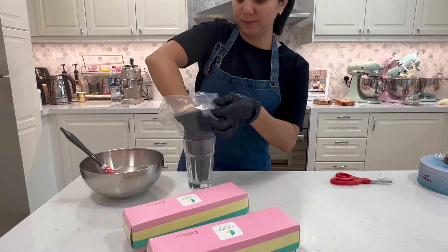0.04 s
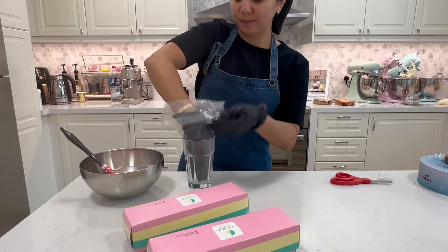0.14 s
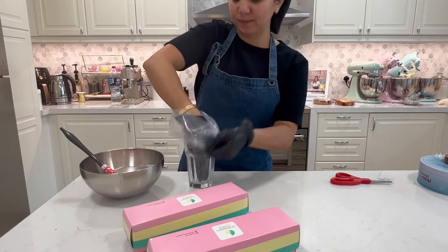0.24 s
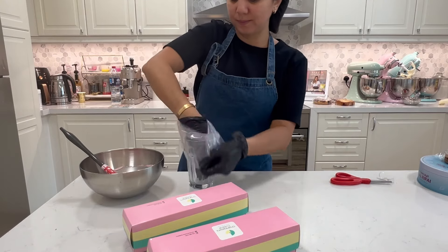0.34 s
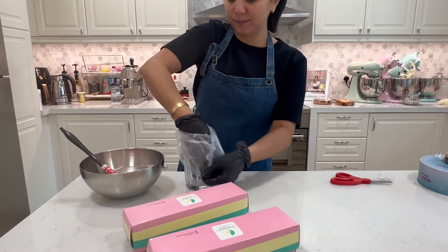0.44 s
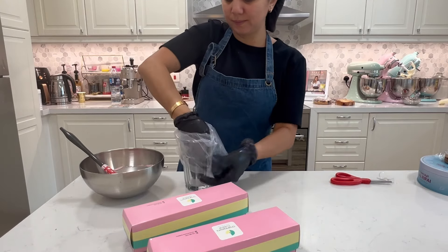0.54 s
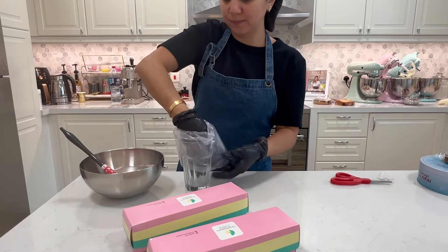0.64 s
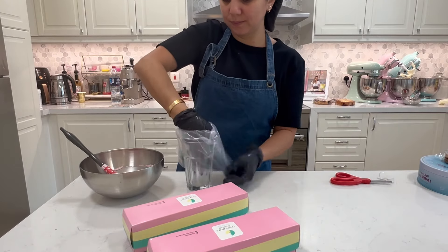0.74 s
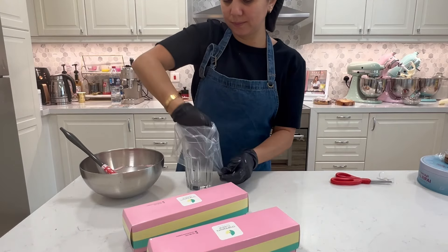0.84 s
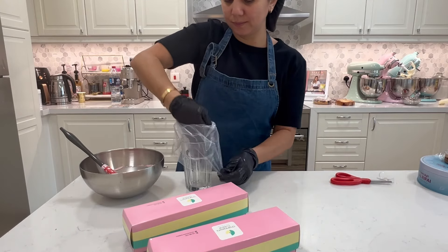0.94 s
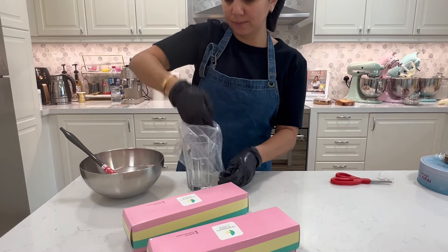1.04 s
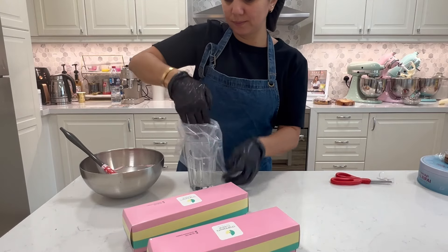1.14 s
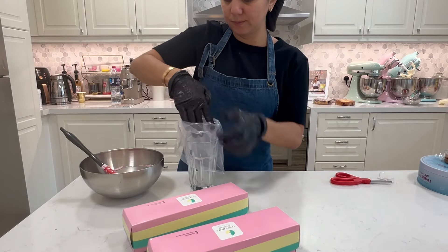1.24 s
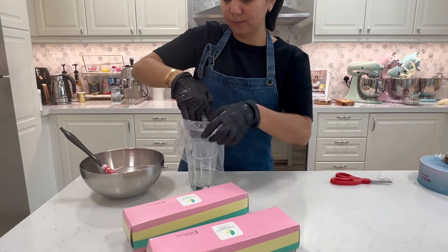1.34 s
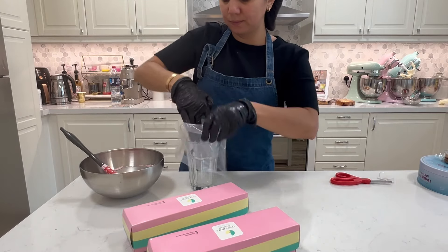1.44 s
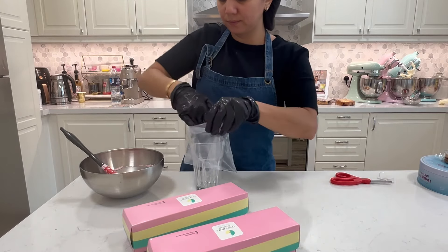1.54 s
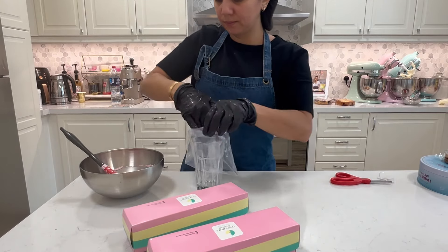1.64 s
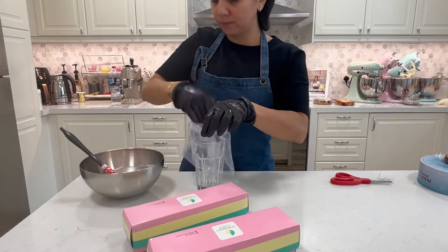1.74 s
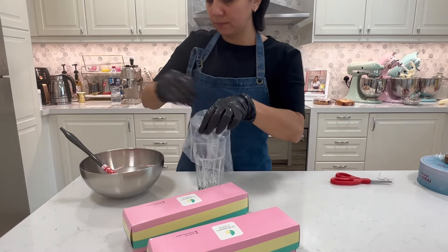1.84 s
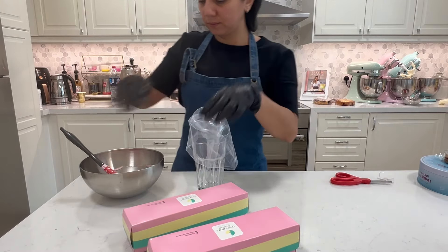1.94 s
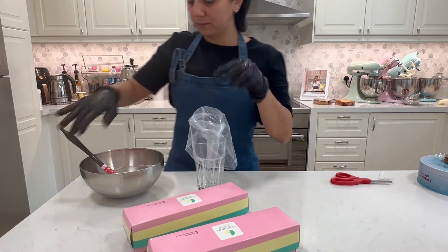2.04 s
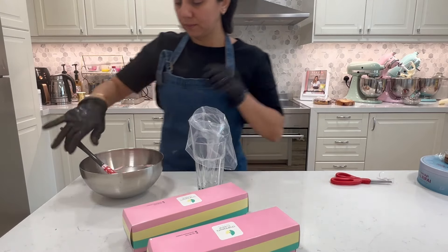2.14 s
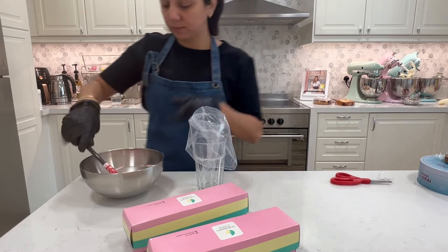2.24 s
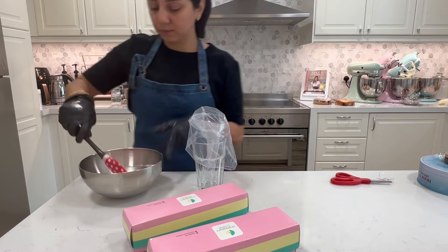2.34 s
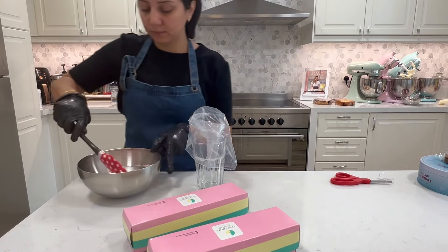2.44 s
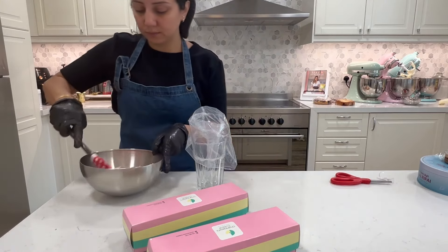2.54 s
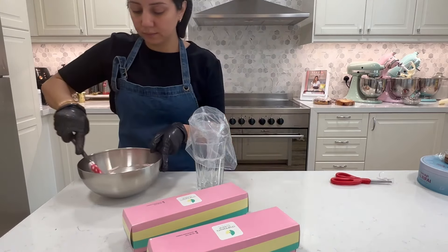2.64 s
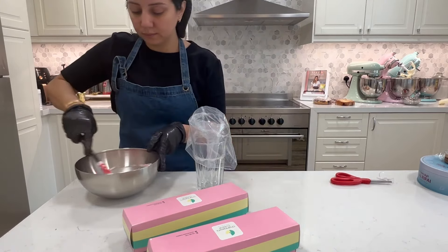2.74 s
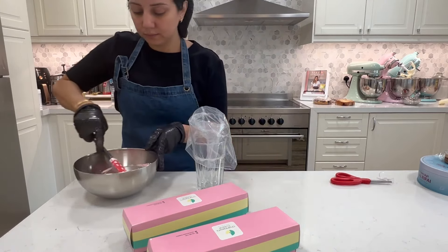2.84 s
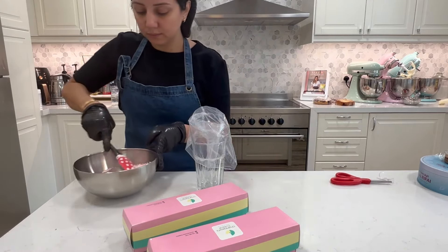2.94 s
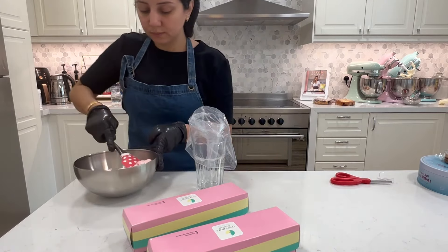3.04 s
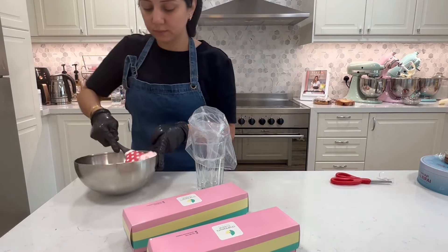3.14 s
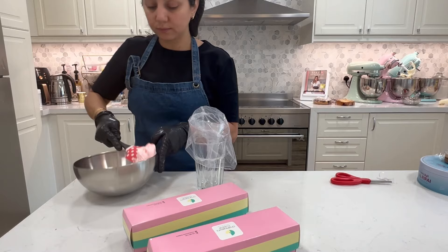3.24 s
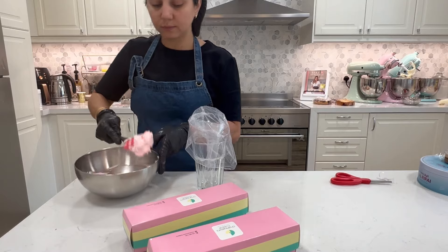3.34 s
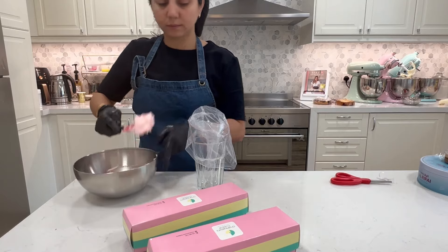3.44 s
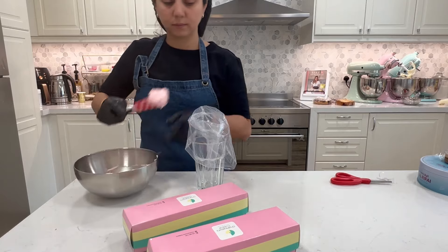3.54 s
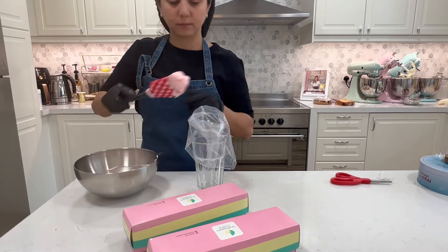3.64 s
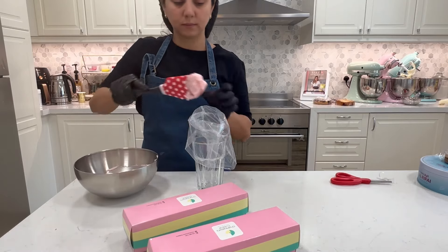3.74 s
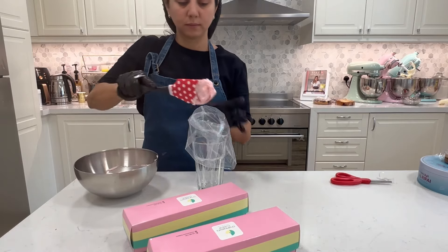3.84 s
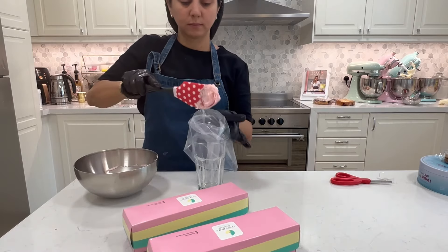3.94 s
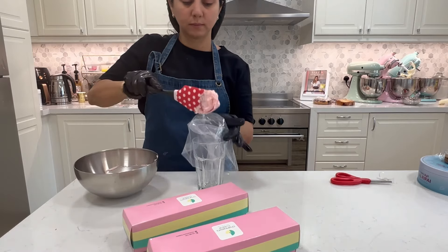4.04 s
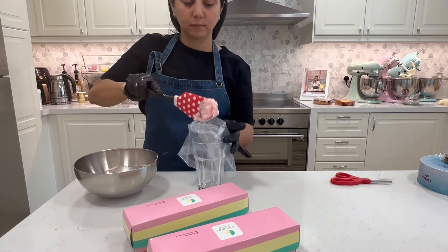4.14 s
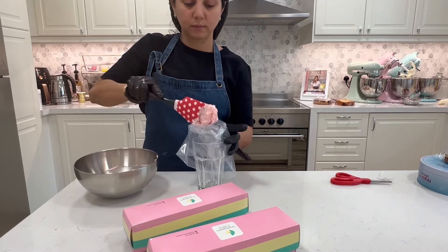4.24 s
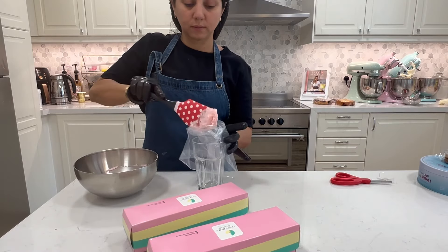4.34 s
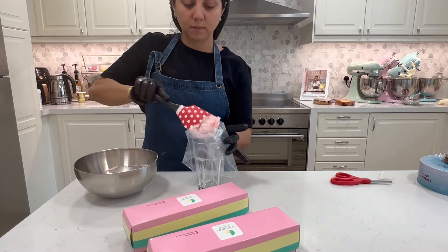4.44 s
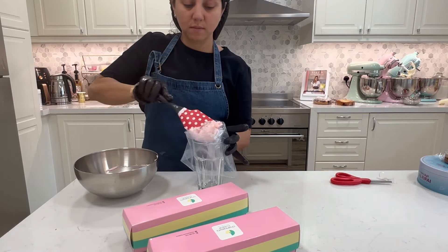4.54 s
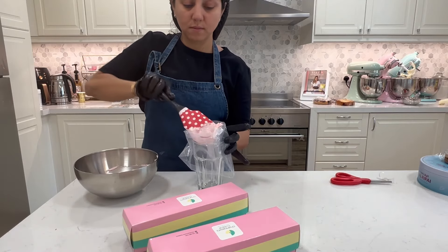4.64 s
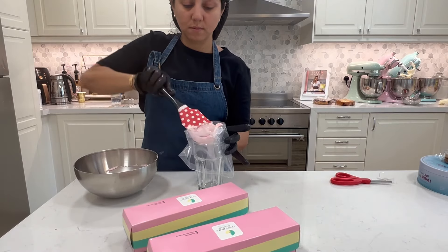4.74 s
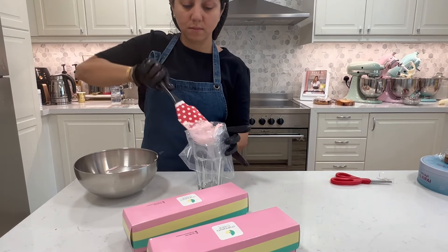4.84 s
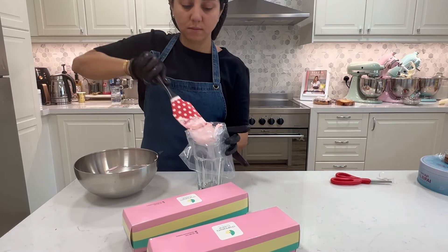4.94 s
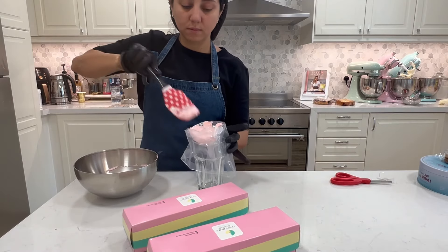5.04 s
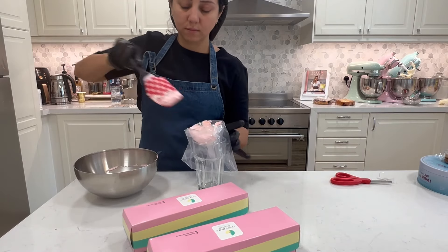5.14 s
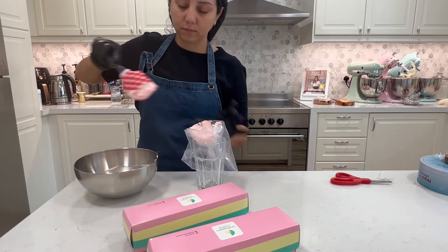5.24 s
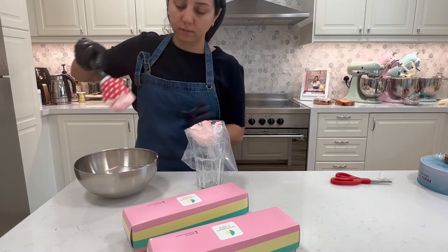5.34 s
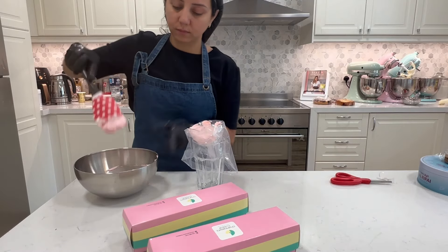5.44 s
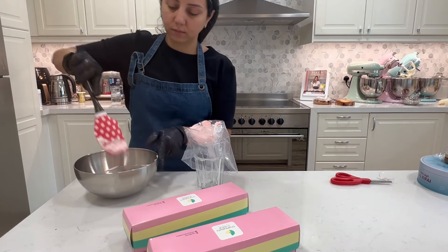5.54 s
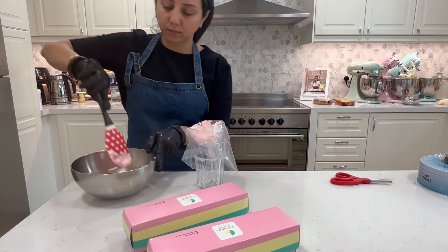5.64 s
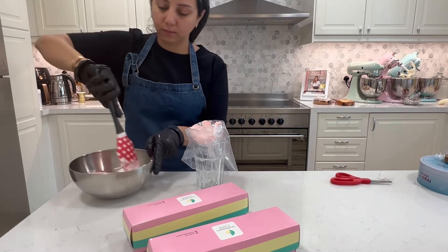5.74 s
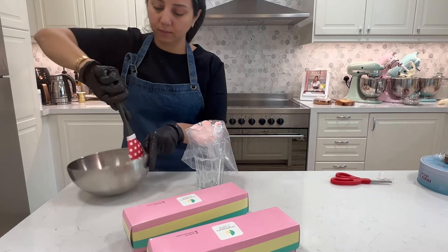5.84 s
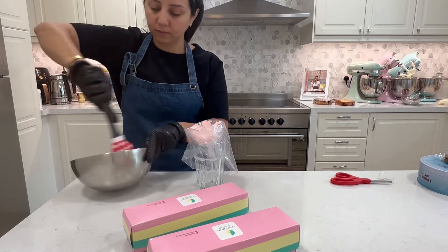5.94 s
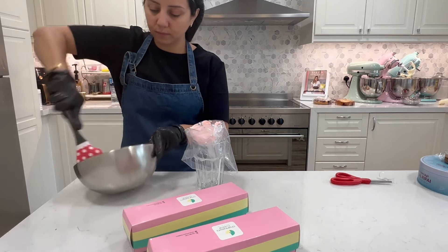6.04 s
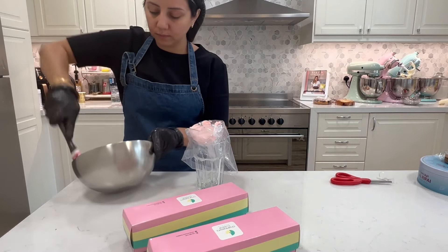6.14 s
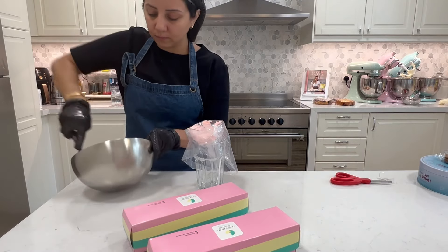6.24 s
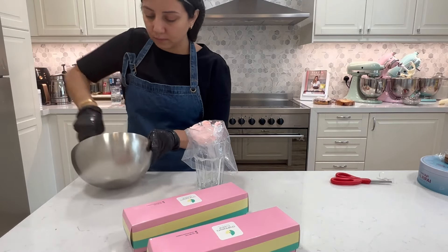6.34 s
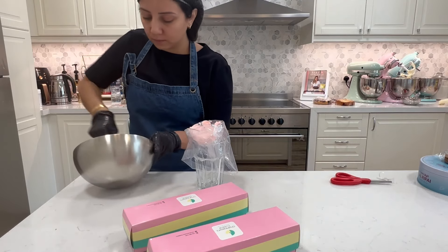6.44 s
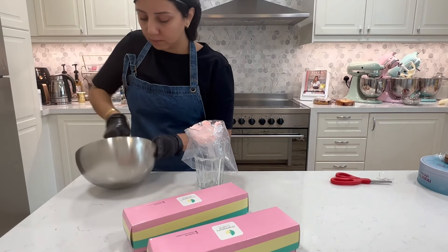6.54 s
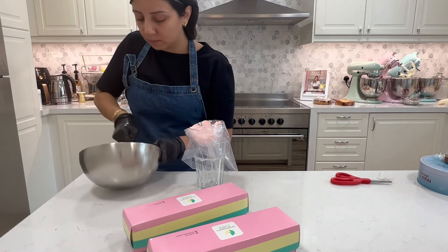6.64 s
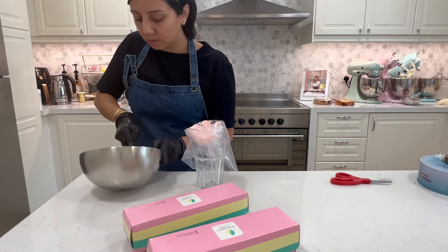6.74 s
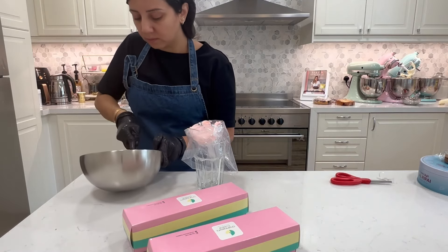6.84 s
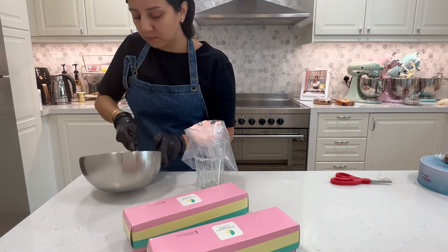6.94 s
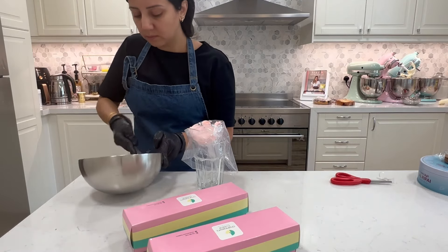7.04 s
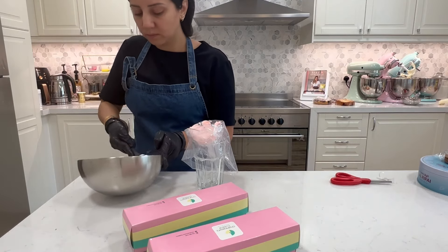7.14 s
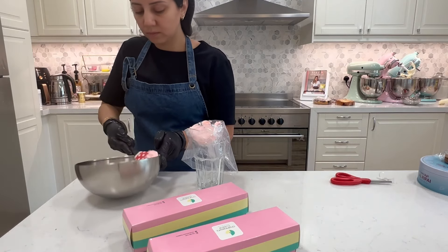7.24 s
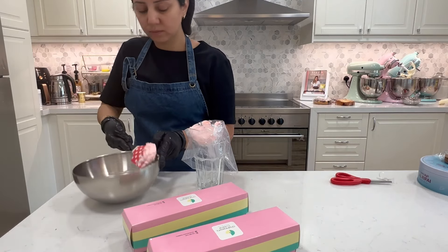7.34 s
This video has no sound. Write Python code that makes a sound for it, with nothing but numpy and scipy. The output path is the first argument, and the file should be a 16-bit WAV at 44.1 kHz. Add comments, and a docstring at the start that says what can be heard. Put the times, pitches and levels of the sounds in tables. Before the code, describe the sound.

A lively tiled kitchen in close stereo, with quiet ventilation rumble and a low appliance hum throughout. From 0 to 0.9 s a thin plastic bag crackles brightly in quick grips, with sharp snaps peaking near 0.75 s, while a tall glass makes short rattling knocks on a stone counter. More crinkles come at 1.0 and 1.3 to 1.6 s; glass chatter grows heavier from 1.45 s, ending in the hardest thudding knock at 1.6 s. Very faint rubbing follows. At 2.57 s a spatula clinks on a steel bowl, ringing briefly. Soft scooping and low bowl judders occur around 3.3 to 3.6 s. From 3.9 to 4.7 s the cream-filled bag crackles more dully, strongest near 4.07 s, with tiny plops; faint snaps reach 5.06 s. From 5.8 s to the end, quiet rubber scrapes, with small muted bowl taps around 6.5 s.

```python
"""A plastic piping bag crackles as it is pushed into a tall glass and folded over its rim: random creases snap.
The glass rocks and chatters on a stone counter: runs of quick contacts set glass and stone ringing.
A spatula clinks on a steel bowl (dying modes), scoops cream, wipes it off into the bag and scrapes the bowl
again (filtered random clicks). A hard, tiled kitchen answers, over low rumble and an appliance hum."""
import sys
import numpy as np
from scipy import signal
from scipy.fft import rfft, irfft
from scipy.io import wavfile
from scipy.ndimage import uniform_filter1d, minimum_filter1d

SR = 44100
rng = np.random.default_rng(int(sys.argv[2]) if len(sys.argv) > 2 else 0)


def transcribe(u):
    """Save the signal u as a 16-bit wav file named by the first command-line argument.

    u: samples, shape (n,) or (channels, n), limited to [-1, 1]; the rate is SR.
    q: integer samples, one column per channel.
    """
    v = np.clip(np.atleast_2d(u).T, -1, 1)
    q = np.round(v * 32767).astype(np.int16)
    wavfile.write(sys.argv[1], SR, q)


N = 325458
TIME = np.arange(N) / SR  # s
FILLED_S = 3  # from this time on (s) the bag is handled with cream in it

# Thud of the counter top, also used for the base of the bowl: [f/Hz, relative level/dB]
THUD_SPECTRUM = [(40, -38.5), (110, -19.5), (175, -9), (270, -5), (400, -27), (800, -23), (3000, -72)]
# Sharp click of a snapping crease, also used for the tick of the handle: [f/Hz, relative level/dB]
CLICK_SPECTRUM = [(200, -14), (500, -4), (1400, -7), (2600, 1), (4200, 0.5), (6000, -1), (9000, -7),
                  (12000, -6), (16000, -13)]


def bag(empty_db=-1.5, filled_db=3.0):
    """Bare film rustles brightly under the hands; cream inside damps its treble."""
    # colour of the bare film: [f/Hz, relative level/dB]
    bare_film = [(100, -12), (250, 2.5), (600, 6.5), (1200, 2), (2400, 4.5), (4000, 3), (6200, 5),
                 (9000, -1), (12000, -8), (16000, -2.5)]
    # colour of the film with cream in it: [f/Hz, relative level/dB]
    creamy_film = [(100, -25), (450, 1.5), (1000, -7.5), (1900, -3), (2900, -4.5), (4000, -8.5),
                   (5700, 3.5), (7300, -7), (9200, -6.5), (10500, -58.5), (16000, -7)]
    empty = grip(filled=False) * crackle(bare_film, per_s=600, spread_db=4.2)
    filled = grip(filled=True) * crackle(creamy_film, per_s=500, spread_db=4.5)
    film = amp(empty_db) * empty + amp(filled_db) * filled
    return kitchen(film, wet_db=-1, early_db=-5)


def grip(filled):
    """Gain of the crumpling over time: each grip tightens, holds and settles."""
    # the hands take hold of the bag: [start t/s, tightening/s, hold/s, relative level/dB]
    holds = [(-.05, 0.0005, 0.017, -31.5), (0.083, 0.019, .13, -34), (0.24, 0.032, 0.22, -33.5),
             (0.56, 0.0038, 0.019, -37.5), (0.682, 0.035, 0.041, -31), (0.84, 0.023, 0.074, -40),
             (1.026, 0.022, 0.026, -37), (1.315, 0.12, 0.024, -31.5), (1.595, 0.0065, 0.027, -39),
             (3.931, 0.039, 0.17, -50), (4.328, 0.0088, 0.015, -49.5), (4.498, 0.0039, 0.014, -50.5),
             (4.61, .015, 0.083, -57), (4.945, 0.015, 0.048, -66.5), (5.044, 0.004, 0.014, -63)]
    slack_db = -17  # a grip tightens from this level, relative to its tightest
    settle_db_per_s = 107  # once let go, the film settles this fast
    power, t = np.zeros(N), np.arange(SR) / SR
    for s, tighten_s, hold_s, db in holds:
        if (s > FILLED_S) == filled:
            tightening = slack_db * np.clip(1 - t / tighten_s, 0, 1)
            settling = settle_db_per_s * np.maximum(t - tighten_s - hold_s, 0)
            add(power, s, amp(db + tightening - settling) ** 2)
    return np.sqrt(power)


def crackle(spectrum, per_s, spread_db, count=9):
    """A swarm of small creases under the hands; each facet of the film ticks at its own pitch."""
    t, swarm = np.arange(256) / SR, np.zeros(N)
    for hz in np.geomspace(900, 13000, num=count):
        facet = np.sin(2 * np.pi * hz * t) * np.exp(-hz * t / .6) * hz ** .75
        swarm += signal.oaconvolve(grains(per_s / count, spread_db), facet)[:N]
    return evened(colour(swarm, spectrum))


def snaps(snap_db=-2.5, crease_db=-4):
    """A large crease flips in a quick burst of clicks, coloured by the heavily damped facet beside it."""
    # the loudest creases: [t/s, relative peak level/dB, pitch of the crease f/Hz, crispness above 6 kHz/dB]
    loud_creases = [(0.074, -26, 1770, -8), (0.1164, -24, 2560, -10), (0.131, -27, 3040, 2),
                    (.199, -21, 2400, -5), (0.237, -26, 2670, 19), (0.3578, -20.5, 2560, 4),
                    (0.417, -24, 3020, 18), (0.4342, -23, 2360, 5), (0.532, -30, 2980, 9),
                    (0.5668, -21, 3900, 2), (.692, -26.5, 2570, 0), (0.716, -21, 1960, -2),
                    (.730, -20, 2180, -15), (0.7471, -16.5, 3970, 8), (0.819, -30, 2830, 14),
                    (1.057, -27, 2680, -5), (1.334, -35, 2350, -13), (1.413, -37, 2610, 0),
                    (1.5166, -28, 1620, 20), (3.5474, -39, 2570, -7.5), (3.928, -47, 2500, -21),
                    (3.957, -35, 1966, -28), (4, -30.5, 1560, -11), (4.0151, -29, 1800, -4),
                    (4.067, -20.5, 2610, -3.5), (4.089, -27.5, 3070, -1), (4.174, -35.5, 2300, -19),
                    (4.342, -29, 5340, 2), (4.44, -36.5, 1332, -33), (4.512, -34.5, 4500, 6),
                    (4.598, -33.5, 2780, -13), (4.6112, -30, 3440, 6.5), (4.62, -34, 2570, 15),
                    (4.712, -34, 2880, -13), (4.977, -47, 2000, -17), (5.002, -47.5, 2480, -14),
                    (5.063, -40, 3500, -0.5)]
    shiver_empty_s, shiver_filled_s = .003, .0016  # bare film shivers longer after a snap
    crease_cycles = 1  # a facet dies within a cycle or so
    # lesser creases snap at random, with a level relative to the grip
    small_per_s, small_db, small_spread_db = 55, 1, 3
    small_empty_db, small_filled_db = 6, 3  # crispness: bare film is brighter than film with cream in it
    crease_hz, crease_spread = 3170, 0.51  # middle pitch, and its spread in natural-log units
    strain_db = -8.5  # lesser creases snap only while the grip is this near its tightest
    out, t = np.zeros(N), np.arange(2048) / SR

    def snap(s, gain, hz, bright_db):
        """One flip makes a broad click and a short pitched tick."""
        shiver_s = shiver_filled_s if s > FILLED_S else shiver_empty_s
        flip = 2 * (t == 0) + rng.standard_normal(len(t)) * np.exp(-t / shiver_s)
        click = peaked(signal.fftconvolve(flip, pulse(CLICK_SPECTRUM, bright_db))[:len(t)])
        facet = np.cos(2 * np.pi * hz * t) * np.exp(-hz * t / crease_cycles)
        crease = signal.fftconvolve(flip, facet)[:len(t)]
        crease = peaked(signal.lfilter(*signal.butter(2, min(1.5 * hz, SR / 3), fs=SR), peaked(crease)))
        add(out, s, amp(snap_db) * gain * (click + amp(crease_db) * crease))

    for s, db, hz, crisp_db in loud_creases:
        snap(s, amp(db), hz, crisp_db)
    force = grip(filled=False) + grip(filled=True)
    tightest = -minimum_filter1d(-force, size=SR // 4)  # strongest grip within a quarter second
    strained = force > amp(strain_db) * tightest
    for at in np.flatnonzero((rng.random(N) < small_per_s / SR) & strained):
        size, pitch = np.clip(rng.standard_normal(2), -2, 2)
        crisp_db = small_filled_db if at / SR > FILLED_S else small_empty_db
        gain = force[at] * amp(small_db + small_spread_db * size)
        snap(at / SR, gain, crease_hz * np.exp(crease_spread * pitch), crisp_db)
    return kitchen(out, wet_db=-4.5, early_db=-9)


def glass(gap_s=.0028, ring_db=-4, chatter_db=-2):
    """The base judders in quick contacts that thud on the counter and set glass and stone ringing."""
    # the glass rocks on the counter: [t/s, relative level/dB, length of the chatter/s]
    knocks = [(0.0797, -20.5, 0.029), (0.2133, -20.5, 0.026), (0.5709, -21.5, 0.018), (.636, -32, 0.0032),
              (0.7145, -29.5, 0.032), (0.849, -18, 0.029), (1.037, -16.5, 0.033), (1.4478, -13.5, 0.023),
              (1.479, -12, 0.026), (1.52, -14.5, 0.011), (1.621, -8.5, 0.021)]
    # glass and counter ring together: [f/Hz, relative level/dB, time to fall by 60 dB/s]
    counter_modes = [(528, -10, 0.1), (700, -5, 0.06), (765, 0, 0.08), (955, -3, 0.1), (1120, 0, 0.06),
                     (1260, -2, 0.06), (1365, -20, .3), (1675, -1.5, 0.07), (1800, -7, 0.07),
                     (2580, -12.5, 0.06), (2725, -12, 0.06)]
    # one contact of glass on stone: [f/Hz, relative level/dB]
    contact_spectrum = [(60, -48), (300, -17.5), (550, 1), (750, -1), (900, 1), (1170, -5), (1450, -7.5),
                        (1700, -10.5), (2250, -10.5), (2700, -23), (3300, -19.5), (6000, -66.5),
                        (12000, -92)]
    # thud under a 0 dB knock, and its dB per dB of knock: hard knocks shake the counter top far more
    thud_db, thud_growth = -8.5, 1.68
    out = np.zeros(N)
    for s, db, length in knocks:
        gaps, force = rng.uniform(.6, 1.4, (2, 50))
        force[0] = 1.7  # the landing is the hardest contact
        at = (np.cumsum(gaps) - gaps[0]) * gap_s
        fade = np.exp(-np.maximum(at - length, 0) / 0.00061)  # contacts die quickly after the chatter
        contacts = np.zeros(SR // 2)
        contacts[(at * SR).astype(int)] = force * rng.choice([-1, 1], len(at)) * fade
        chatter = amp(chatter_db) * peaked(colour(contacts, contact_spectrum))
        thud = amp(thud_db + thud_growth * db) * peaked(colour(contacts, THUD_SPECTRUM))
        ringing = signal.fftconvolve(contacts, ring(counter_modes, spread=0.012))[:len(contacts)]
        add(out, s, thud + amp(db) * (chatter + amp(ring_db) * peaked(ringing)))
    return kitchen(out, wet_db=-3, early_db=-5)


def clinks(steel_db=-10, shimmer_db=-18, shimmer_t60=0.44, tick_db=-5, base_db=-18, clack_t60=0.013):
    """Handle clacks on the rim, base thumps the counter, and steel rings on in beating clusters of modes."""
    # the spatula strikes the bowl:
    # [t/s, relative level/dB, change of the modes near 4.7 kHz by the point of contact/dB, hardness f/Hz]
    strikes = [(2.5745, -23, 0, 11400), (2.622, -66, -10, 1500), (2.636, -38.5, -24, 700),
               (6.461, -43, -13.5, 3500), (6.511, -59, -16, 1800)]
    # modes of the steel bowl: [f/Hz, relative level/dB, time to fall by 60 dB/s]
    bowl_modes = [(700, -3, .7), (964, -1, .4), (1075, -1, .45), (1583, -1, .26), (2200, -2, .25),
                  (2420, -3, .2), (2966, -3, .45), (3380, -8, .35), (3975, -6, .38), (4610, -4, .45),
                  (4716, -3.5, .7), (5561, -3, .4), (6540, -3, .35), (7235, -1, .6), (7520, -6, .45),
                  (7830, -7, .45), (8620, -3, .3), (9300, -5, .15)]
    # countless weaker modes merge into a shimmer: [f/Hz, relative level/dB]
    shimmer_spectrum = [(300, 1), (900, 24), (2000, -15), (3500, 8), (6000, 1), (9000, 3), (10500, -21),
                        (16000, -51)]
    out, t = np.zeros(N), np.arange(SR // 2) / SR
    for s, db, mute_db, hard_hz in strikes:
        modes = []
        for hz, level, t60 in bowl_modes:
            nearness = np.exp(-(np.log(hz / 4700) / 0.7) ** 2)
            modes.append((hz, level + mute_db * nearness, t60))
        steel = peaked(sum(ring(modes, spread=.0055) for _ in range(5)))  # slightly detuned copies beat
        shimmer = colour(rng.standard_normal(len(t)), shimmer_spectrum)
        shimmer = peaked(shimmer * amp(-60 * t / shimmer_t60))
        damped = [(hz, level, clack_t60) for hz, level, _ in modes]  # while the handle presses
        clack = peaked(ring(damped, spread=0.006))
        add(clack, 0, amp(tick_db) * peaked(pulse(CLICK_SPECTRUM)))
        blow = clack + amp(steel_db) * steel + amp(shimmer_db) * shimmer
        blow = peaked(signal.lfilter(*signal.butter(1, hard_hz, fs=SR), blow))  # cream cushions softer blows
        add(blow, 0, amp(base_db) * peaked(pulse(THUD_SPECTRUM)))
        add(out, s, amp(db) * blow)
    return kitchen(out, wet_db=1.5, early_db=-4)


def scrape(hiss_db=-5, drag_db=-6):
    """Soft rubber slides along the steel: fine hiss and a high ring over the dull drag of the cream."""
    # spatula and gloves rub on the bowl, levels relative:
    # [start t/s, length/s, hiss level/dB, drag level/dB, ring of the steel relative to the hiss/dB]
    rubs = [(1.968, 0.29, -68, -74, -6.5), (2.184, 0.65, -62, -81, -17), (2.489, 0.53, -60, -51.5, -1),
            (3.248, 0.27, -69, -51, -23), (3.52, 0.4, -67, -75, -9), (5.762, 0.7, -83.5, -58, -15),
            (5.955, 0.41, -64, -86, -6), (6.459, 0.19, -67.5, -52.5, 5), (6.63, 0.25, -72, -61.5, -1),
            (6.997, 0.26, -75, -59, -10), (7.26, 0.47, -72, -54, -5)]
    # fine hiss of the rubber: [f/Hz, relative level/dB]
    hiss_spectrum = [(800, 12), (2000, 10), (4000, 5), (6300, 10.5), (7000, 3), (8500, -9), (10000, 0),
                     (12000, -68), (16000, -7)]
    # dull drag of the cream: [f/Hz, relative level/dB]
    drag_spectrum = [(150, -6), (320, 8), (520, 1), (730, 4), (900, -7), (1550, -10.5), (3000, -31),
                     (8000, -39)]
    sing_hz, sing_width_hz = 7940, 1600  # close upper modes, excited where the blade wipes the steel bare
    slide, push, bare = np.zeros((3, N))
    for s, length, slide_db, push_db, ring_db in rubs:
        add(slide, s, amp(slide_db) * stroke(length))
        add(push, s, amp(push_db) * stroke(length))
        add(bare, s, amp(slide_db + ring_db) * stroke(length))
    slips = grains(per_s=2100, spread_db=4.5)
    edges = [sing_hz - sing_width_hz / 2, sing_hz + sing_width_hz / 2]
    singing = evened(signal.lfilter(*signal.butter(2, edges, "bandpass", fs=SR), slips))
    hiss = amp(hiss_db) * (slide * evened(colour(slips, hiss_spectrum)) + bare * singing)
    drag = amp(drag_db) * push * evened(colour(grains(per_s=770, spread_db=2.0), drag_spectrum))
    return kitchen(hiss + drag, wet_db=2.5, early_db=4.0)


def stroke(length, peak=0.19):
    """Gain of one stroke, the root of the blade's speed: fastest after the share `peak` of its length."""
    progress = np.arange(0, length, 1 / SR) / length
    return np.sqrt(np.interp(progress, [0, peak, 1], [0, 1, 0]))


def bumps(grate_db=-3):
    """The bowl judders on its base: slips grate on the stone and stir a ring smothered by the cream."""
    # the cream-laden bowl judders on the counter: [t/s, length/s, relative level/dB]
    judders = [(3.313, 0.027, -44), (3.387, 0.023, -35.5), (3.405, 0.03, -44), (3.448, 0.04, -39.5),
               (3.506, .035, -39.5), (3.569, 0.021, -45.5), (7.344, .03, -48.5)]
    # steel base slipping on stone: [f/Hz, relative level/dB]
    grate_spectrum = [(100, -20), (280, -15), (600, 6.5), (1150, -16.5), (1800, -24), (8000, -39.5)]
    # modes of the laden bowl: [f/Hz, relative level/dB, time to fall by 60 dB/s]
    laden_modes = [(178, -7, 0.3), (272, 0, 0.08), (520, -4.5, 0.11), (845, -7, 0.05), (1140, -12, 0.06)]
    out = np.zeros(N)
    for s, length, db in judders:
        slips = judder(length, slip_s=.006)
        ringing = peaked(signal.fftconvolve(slips, ring(laden_modes, spread=.02))[:len(slips)])
        grate = peaked(colour(slips, grate_spectrum))
        add(out, s, amp(db) * (ringing + amp(grate_db) * grate))
    return kitchen(out, wet_db=-1, early_db=-3)


def scuffs(slip_s=0.0048):
    """The rubber blade catches on the steel: a short run of slips stirs the low modes of the bowl."""
    # the blade catches and judders: [t/s, length/s, relative level/dB]
    catches = [(5.87, .05, -58), (6.006, 0.064, -45.5), (6.987, .016, -48), (7.33, 0.07, -57)]
    # colour of the slips: [f/Hz, relative level/dB]
    scuff_spectrum = [(200, -20), (520, -7), (745, 0), (920, -10), (1150, -9), (1600, -13), (3000, -30),
                      (9000, -35)]
    out = np.zeros(N)
    for s, length, db in catches:
        add(out, s, amp(db) * peaked(colour(judder(length, slip_s), scuff_spectrum)))
    return out


def judder(length, slip_s, count=40):
    """An uneven run of slips, about slip_s apart, that weakens to nothing over its length."""
    gaps, force = rng.uniform(.4, 1.6, (2, count))
    force[0] = 1.6  # hardest at first
    at = (np.cumsum(gaps) - gaps[0]) * slip_s
    slips = np.zeros(SR)
    slips[(at * SR).astype(int)] = force * rng.choice([-1, 1], count) * np.clip(1 - at / length, 0, 1)
    return slips


def cream(rise_s=0.0016, decay_s=0.0055):
    """Small air pockets pop as the cream leaves the blade: short dying sine tones."""
    # cream smacks in the bag: [t/s, relative level/dB, pitch of the air pocket f/Hz]
    plops = [(4.343, -47, 476), (4.441, -46, 562), (4.506, -47.5, 523), (4.713, -38.5, 544)]
    out, t = np.zeros(N), np.arange(SR // 8) / SR
    for s, db, hz in plops:
        swell = (1 - np.exp(-t / rise_s)) * np.exp(-t / decay_s)
        add(out, s, amp(db) * peaked(np.sin(2 * np.pi * hz * t) * swell))
    return out


def room_tone(waver=1.0, air_db=-48.5):
    """Ventilation rumble is filtered noise; an appliance hums in sines whose phase wavers (radians)."""
    # colour of the rumble: [f/Hz, relative level/dB]
    air_spectrum = [(15, -27), (25, -24), (49, -4.5), (87, -4.5), (141, -1.5), (190, -9.5), (263, -8.5),
                    (405, -16.5), (1070, -23), (2990, -39), (7310, -42.5), (9070, -48), (10100, -77.5),
                    (11600, -69), (16000, -84)]
    # tones of the hum: [f/Hz, level/dB]
    hum_tones = [(45, -54), (141, -53.5), (176, -71)]
    air = np.array([colour(side, air_spectrum) for side in diffuse(rng.standard_normal((2, N)))])
    hum = np.zeros(N)
    for hz, db in hum_tones:
        drift = uniform_filter1d(rng.standard_normal(N), size=5000)
        drift = evened(uniform_filter1d(drift, size=3000))
        hum += amp(db) * np.sqrt(2) * np.sin(2 * np.pi * hz * TIME + waver * drift)
    return amp(air_db) * evened(air) + hum


def kitchen(x, wet_db, early_db, port=0.32):
    """Direct sound, shifting reflections from counter and cupboards, and a tail that dies band by band."""
    # how long the tail lasts: [f/Hz, time to fall by 60 dB/s]
    tail_times = [(100, 0.38), (500, 0.63), (1000, 0.52), (1800, 0.75), (3000, 0.68), (6000, 0.52),
                  (8500, 0.43), (12000, 0.35), (16000, 0.023)]
    echoes = rng.random((2, SR)) < 5000 / SR  # about 5000 a second
    taps = rng.choice([-1., 1.], (2, SR)) * echoes * (np.arange(SR) > .004 * SR)
    hz, t, z = signal.stft(taps, SR, nperseg=256)
    fade = amp(-60 * t / read(tail_times, hz)[:, None])
    tail = signal.istft(z * fade, SR, nperseg=256)[1][:, :SR]
    tail = diffuse(tail / np.linalg.norm(tail[0]))
    out = amp(wet_db) * signal.fftconvolve(x[None], tail, axes=1)[:, :N]
    for k in range(3):  # the hands keep moving, so three patterns of early reflections take turns
        early = np.zeros((2, 2048))
        for side in early:
            delay = rng.uniform(.0008, .016, size=24)  # s
            side[(delay * SR).astype(int)] = rng.choice([-1, 1], len(delay)) * np.exp(-delay / .008)
        early = diffuse(early / np.linalg.norm(early[0]))
        turn = np.sqrt(2 / 3) * np.cos(np.pi * (7 * TIME + k / 3))
        out += amp(early_db) * signal.oaconvolve((x * turn)[None], early, axes=1)[:, :N]
    # the microphone port hollows the direct sound near 4.4 kHz: a copy five samples later
    direct = (x + port * np.pad(x, (5, 0))[:N]) / (1 + port)
    return out + np.array([np.pad(direct, (1, 0))[:N], direct])  # reaches the right microphone first


def diffuse(pair):
    """Two unrelated signals become a diffuse field: alike in the bass, apart in the treble."""
    # left-right likeness of diffuse sound: [f/Hz, likeness from 0 to 1]
    likeness = [(50, 0.78), (130, 0.91), (250, 0.7), (500, 0.081), (2000, 0.024)]
    # sound from all sides is picked up with dips in the top octave: [f/Hz, level/dB]
    pickup = [(100, 0), (9200, 0), (10500, -10), (11600, -4), (12800, -6), (14000, -13), (15300, -6)]
    a, b = rfft(pair)
    hz = np.fft.rfftfreq(pair.shape[1], 1 / SR)
    same = read(likeness, hz)
    sides = np.array([a, same * a + np.sqrt(1 - same ** 2) * b])
    return irfft(sides * amp(read(pickup, hz)), pair.shape[1])


def ring(modes, spread=0):
    """Dying modes after one blow; the point of contact shifts them slightly."""
    t = np.arange(SR // 2) / SR
    out = np.zeros(len(t))
    for k, (hz, db, t60) in enumerate(modes):
        shifted_hz = hz * (1 + spread * rng.normal())
        out += (-1) ** k * amp(db - 60 * t / t60) * np.sin(2 * np.pi * shifted_hz * t)
    return out


def grains(per_s, spread_db):
    """Random tiny clicks, mostly small and a few large."""
    chance, out = rng.random(N), np.zeros(N)
    at = np.flatnonzero(chance < per_s / SR)
    size = np.minimum(-np.log(chance[at] * SR / per_s), 4)  # the chance that made a click also sizes it
    out[at] = amp(spread_db * size) * (-1.) ** at
    return evened(out)


def pulse(spectrum, bright_db=0, size=2048):
    """The sharpest causal click with this spectrum; brightness is a shelf above 6 kHz."""
    hz = abs(np.fft.fftfreq(size, 1 / SR))
    shelf = hz ** 4 / (hz ** 4 + 6000 ** 4)
    log_gain = np.log(amp(read(spectrum, hz) + bright_db * shelf))
    return np.fft.ifft(np.exp(np.conj(signal.hilbert(log_gain)))).real  # minimum phase


def colour(x, spectrum):
    """Passes x through a body with this spectrum."""
    return signal.oaconvolve(x, pulse(spectrum))[:len(x)]


def read(points, hz):
    """Reads a spectrum along a log-frequency axis."""
    f, value = np.transpose(points)
    return np.interp(np.log(hz + 1), np.log(f + 1), value)


def add(mix, s, sound):
    """Mixes a sound in at time s (seconds)."""
    part = mix[max(round(s * SR), 0):][:len(sound)]
    part += sound[:len(part)]


def amp(db):
    """Decibels to gain."""
    return 10 ** (np.asarray(db) / 20)


def evened(x):
    """Scales to rms 1."""
    return x / np.sqrt(np.mean(x ** 2) + 1e-20)


def peaked(x):
    """Scales so that the loudest 3 ms have rms 1."""
    return x / np.sqrt(uniform_filter1d(x ** 2, size=132).max() + 1e-20)


def scene():
    """All sources in the kitchen."""
    soft = kitchen(cream() + scuffs(), wet_db=-2, early_db=-2)
    return bag() + snaps() + glass() + clinks() + scrape() + bumps() + soft + room_tone()


def record(dry):
    """The two microphones differ a little in colour; a low-pass then removes the highest treble."""
    # colour difference of the microphones: [f/Hz, left minus right/dB]
    balance = [(100, 0), (300, 2.5), (700, 0), (2400, -1), (4400, -6), (8000, -2), (12000, 1)]
    edge_hz = 16100
    tilt_db = read(balance, np.fft.rfftfreq(N, 1 / SR)) / 2
    heard = irfft(rfft(dry) * amp([tilt_db, -tilt_db]), N)
    low_pass = signal.firwin(511, edge_hz, window=("kaiser", 9), fs=SR)
    return signal.oaconvolve(heard, low_pass[None], "same")


dry = scene()
out = record(dry)
transcribe(out)
```